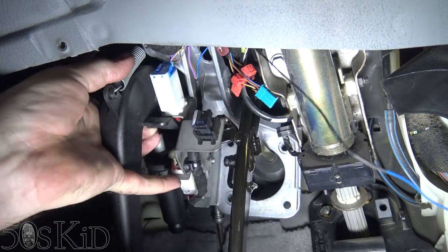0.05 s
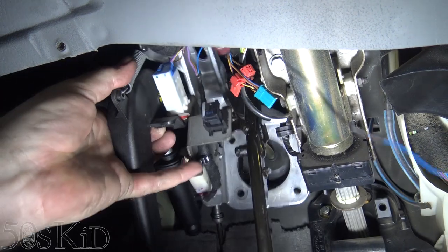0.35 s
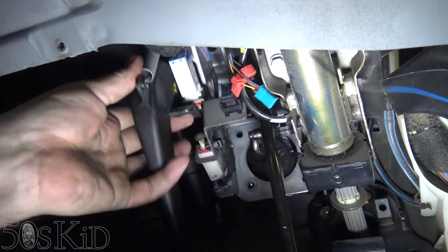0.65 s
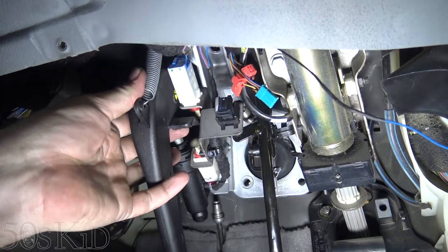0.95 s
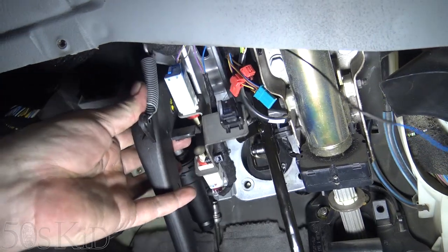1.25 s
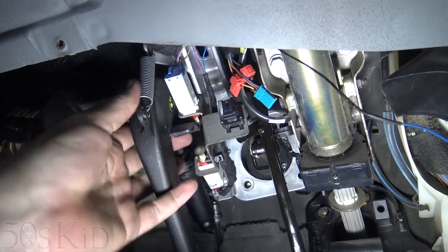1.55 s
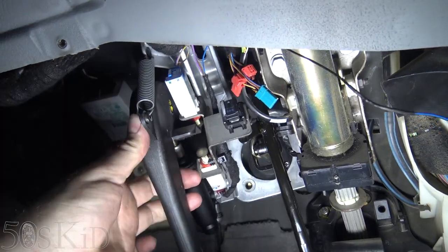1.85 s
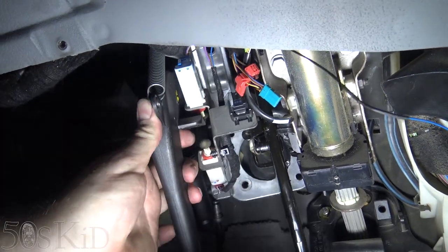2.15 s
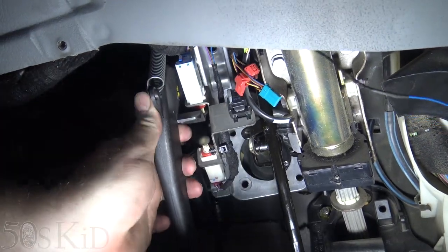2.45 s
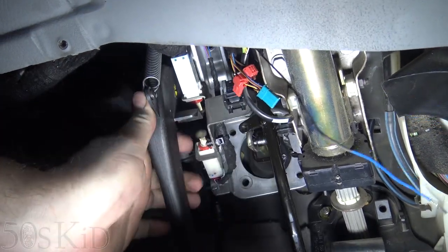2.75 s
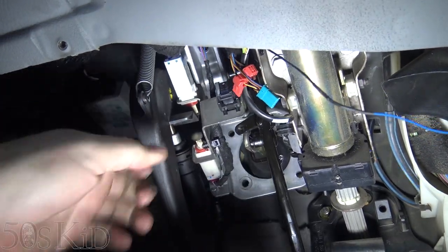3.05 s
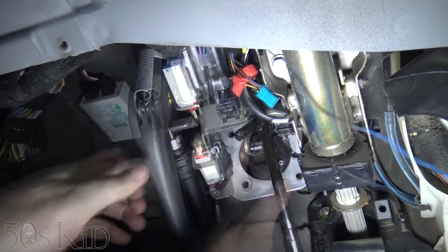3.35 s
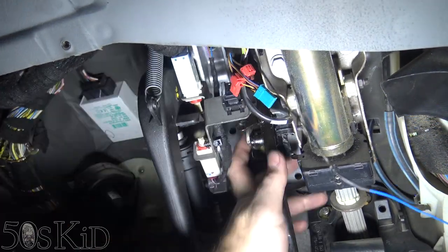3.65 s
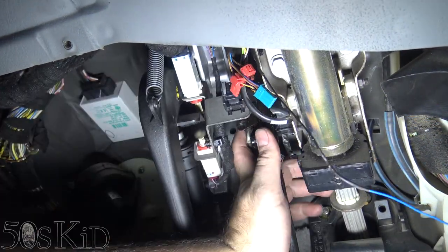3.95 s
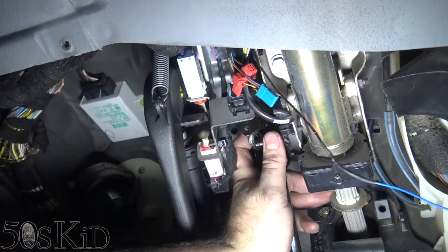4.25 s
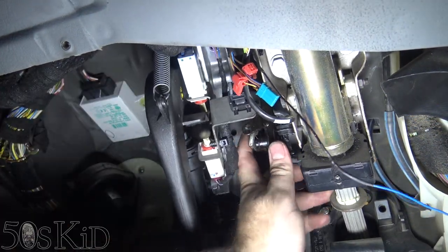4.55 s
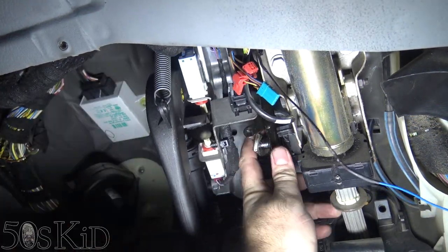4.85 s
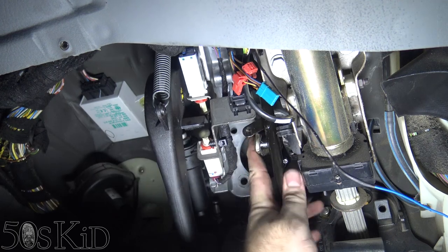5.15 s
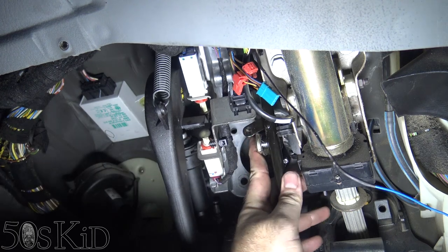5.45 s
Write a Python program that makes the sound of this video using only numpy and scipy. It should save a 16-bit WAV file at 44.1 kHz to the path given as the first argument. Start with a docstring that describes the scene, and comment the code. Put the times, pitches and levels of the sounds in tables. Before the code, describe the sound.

Close, irregular clunks and small clicks as a hand works a car pedal and its linkage, with brief scrapes and a tiny creak.

```python
"""In a car's footwell, a hand works a pedal and its linkage close to the microphone.
The pedal knocks on its stop; loose plastic and steel parts click, rub and groan against their bracket.
The bulkhead (the wall behind the pedal) booms under each blow and the carpeted cabin answers briefly.
Underneath are the rustle of hand and sleeve, the still garage and a faint hiss."""
import sys
import numpy as np
from scipy import signal
from scipy.fft import rfft, irfft, next_fast_len
from scipy.io import wavfile
from scipy.ndimage import map_coordinates

SR = 44100
rng = np.random.default_rng(int(sys.argv[2]) if len(sys.argv) > 2 else 0)


def store_pcm(level_fs):
    """Save levels as 16-bit WAV."""
    pcm = np.round(np.clip(level_fs, -1, 1) * 32767).astype(np.int16)
    wavfile.write(sys.argv[1], SR, np.atleast_2d(pcm).T)


N = 247401
FREQS_HZ = np.fft.rfftfreq(8192, 1 / SR) + 1

# the tones each part rings with when hit: f/Hz, width/Hz, level/dB
BULKHEAD_TONES = [(88.2, 8.2, -6), (114.7, 22.5, 2), (168, 58, -1)]
PEDAL_TONES = [(230, 110, -3.5), (292, 46, 1), (381.7, 90, -12)]
BRACKET_TONES = [(609, 81, 2), (780, 62, -6), (854, 60, -1), (955, 39, -2), (1190, 57, -13),
                 (1360, 69, -16.5), (1530, 93, -14.5)]
# the tones of the pedal arm when rubbed: f/Hz, width/Hz, level/dB
RASP_TONES = [(607, 150, -1.5), (860, 77, 5.5), (1010, 73, 2), (1380, 150, -2), (1730, 270, -8.5),
              (2290, 250, -17)]
# the dry crack of hard surfaces meeting: f/Hz, level/dB
CRACK_SPECTRUM = [(900, -18.5), (1900, 6), (2800, 1), (3200, -2), (3600, 2), (4100, -3), (5100, -3.5),
                  (5900, -5), (6700, -6.5), (9500, -14), (14000, -29)]


def knocks():
    """The pedal hits its stop: one firm blow sets bulkhead, pedal and bracket ringing at once."""
    # blows on the stop: t/s, level/dB, hardness/0-1
    hits = [(0.719, -17.5, 0.58), (2.8041, -18, 0.53), (3.8827, -19, 0.25), (5.03, -19, 0.6)]
    out = np.zeros(N)
    for start, db, hardness in hits:
        *part_dbs, crack_db = share_blow(db, hardness, bulkhead=-4, pedal=1, bracket=-7.5, snap=-26)
        parts = zip([BULKHEAD_TONES, PEDAL_TONES, BRACKET_TONES], part_dbs)
        body = struck(sum(ring(tones, part_db, vary_db=1.5) for tones, part_db in parts))
        sound = body + crack(crack_db, fade_s=0.0026, after_db=-19.5)
        add(out, start, in_cabin(sound, near_db=-12.5, far_db=-27.5))
    return out


def judder():
    """The linkage shakes into its seat: three growing touches, the main blow, then one bounce."""
    seat_s, seat_db, gap_s, soft = 4.3217, -18.5, .0098, .15
    lead_in = [(seat_s - k * gap_s, seat_db - 5.5 - 3 * k, soft) for k in (1, 2, 3)]
    seating = (seat_s, seat_db, 0.4)  # t/s, level/dB, hardness/0-1
    bounce = (seat_s + gap_s, seat_db - 14, soft)
    return light_hits(lead_in + [seating, bounce], bulkhead=-2.5, pedal=-6.5, bracket=0.5, snap=-27)


def bumps():
    """The whole assembly bumps the bulkhead, which gives a low boom."""
    # bumps: t/s, level/dB, hardness/0-1
    hits = [(.414, -28.5, 0.76), (.489, -27.5, 0.4), (1.135, -38.5, 1), (1.841, -36, 0.42),
            (2.01, -48.5, 0.2), (2.492, -36.5, 0.36), (4.282, -35, 0.2), (4.372, -34, .1),
            (4.682, -37.5, 0.2), (4.705, -34.5, .2)]
    return light_hits(hits, bulkhead=0.5, pedal=-7, bracket=-17.5, snap=-34)


def taps():
    """The pedal taps in the slack of its pivot."""
    # taps: t/s, level/dB, hardness/0-1
    hits = [(.133, -44, 0.68), (.152, -42.5, 0.78), (.231, -43, 0.55), (.279, -40.5, 0.5),
            (.351, -44, 0.84), (.375, -43, 0.85), (.394, -37, 0.56), (.581, -40, 0.8), (.603, -40.5, 0.3),
            (2.064, -50, 1), (2.46, -43, 0.73), (3.135, -41.5, 0), (5.216, -38, 0)]
    return light_hits(hits, bulkhead=0, pedal=1, bracket=-10.5, snap=-25)


def clicks():
    """Loose parts click on the bracket."""
    # clicks: t/s, level/dB, hardness/0-1
    hits = [(.051, -42, 0.62), (.848, -45.5, 0.56), (.885, -36.5, 0.26), (1.066, -49.5, 0.52),
            (1.125, -49.5, 0.4), (1.321, -48.5, 0.2), (1.355, -41, 0), (1.962, -56, 0.77),
            (2.286, -47, 0.2), (2.313, -42.5, 0.05), (2.323, -39, 0.66), (2.345, -43.5, 0.73),
            (2.373, -44, 0.59), (2.723, -43, 0.55), (3.052, -59.5, 0.94), (3.122, -61.5, 1),
            (5.277, -42.5, .2)]
    return light_hits(hits, bulkhead=-6.5, pedal=-6, bracket=-1, snap=-14.5)


def pings():
    """Small steel parts chatter and ring; the spot that is hit favours the tones near one pitch."""
    # hits on the steel: t/s, level/dB, favoured f/Hz, reach around it/octaves
    hits = [(0.0449, -32, 1700, 4), (0.719, -39.5, 5350, 0.042), (2.323, -52.5, 8300, 0.035),
            (2.346, -56.5, 8300, .04), (2.805, -44, 1900, 0.53), (4.302, -51, 4650, 0.25),
            (4.323, -22, 1110, 0.37), (4.47, -50.5, 1780, 0.09), (5.03, -31.5, 1430, 0.29),
            (5.244, -56.5, 4450, 1.9), (5.406, -58.5, 3900, 0.097)]
    # the steel's tones: f/Hz, width/Hz, level/dB
    steel_tones = [(978, 160, 5), (1360, 60, -2.5), (1730, 34, -5), (2030, 22, -12.5), (2600, 45, -23),
                   (2850, 60, -16), (3570, 34, -15), (4030, 40, -11), (4590, 91, -8.5), (5030, 210, -18.5),
                   (6780, 90, -11), (8100, 300, -28)]
    out = np.zeros(N)
    for start, db, hz, reach in hits:
        falloff = 1 + (np.log2(FREQS_HZ / hz) / reach) ** 2
        steel = struck(ring(steel_tones, vary_db=1) / falloff)
        sound = at_level(chatter(steel, fade_s=0.0041, per_s=1100), db)
        add(out, start, in_cabin(sound, near_db=-18.5, far_db=-23))
    return out


def scrapes():
    """Sliding parts catch in tiny slips that ring the pedal arm and add a fine gritty noise."""
    # dry strokes: start/s, end/s, level/dB, grit compared with the rasp/dB
    strokes = [(0.488, 0.517, -54, -1.5), (0.57, 0.72, -55.5, -11.5), (1.384, 1.548, -57.5, -17),
               (1.83, 1.872, -52, -24), (1.912, 1.918, -49, -24), (2.149, 2.298, -50, -27),
               (2.183, 2.242, -44, -18), (2.394, 2.49, -51, -11.5), (2.551, 2.583, -41.5, -24),
               (4.311, 4.325, -27.5, -24)]
    catches = slips(per_s=2000, spread_db=3)
    rasp = unit(signal.fftconvolve(catches, struck(ring(RASP_TONES)))[:N])
    grit = coloured(catches, CRACK_SPECTRUM)
    return sum(amp(db) * pressure(start, end, edge_s=0.0049) * (rasp + amp(grit_db) * grit)
               for start, end, db, grit_db in strokes)


def groans():
    """Under load the pivot sticks and slips almost regularly, in a rough falling tone."""
    # groans: start/s, end/s, first f/Hz, last f/Hz, level/dB
    glides = [(2.403, 2.443, 515, 493, -40.5), (2.456, 2.486, 515, 469, -36)]
    t, out = np.arange(N) / SR, np.zeros(N)
    for start, end, start_hz, end_hz, db in glides:
        pitch = np.interp(t, [start, end], [start_hz, end_hz]) * (1 + 0.046 * wobble(190))
        phase = 2 * np.pi * np.cumsum(pitch) / SR
        tone = np.sin(phase) + amp(-11) * np.sin(2 * phase) + amp(-23) * np.sin(3 * phase)
        rough_tone = unit(tone * amp(2.9 * wobble(120)))
        out += amp(db) * pressure(start, end, edge_s=0.011) * rough_tone
    return out


def handling():
    """Hand and sleeve move on the parts: one effort drives a rumble, a rub, a rustle and stray ticks."""
    # how strongly the hand moves: t/s, level/dB
    movement = [(0.0, -49), (0.26, -60.5), (0.59, -51), (1.11, -64.5), (1.81, -70.5), (2.2, -57),
                (2.34, -58), (2.4, -53), (2.54, -56.5), (3.12, -71.5), (3.7, -65), (4.15, -61.5),
                (4.35, -57.5), (5.6, -63.5)]
    # the colour of each noise, dull to bright: f/Hz, level/dB
    rumble_spectrum = [(20, -16), (55, 2.5), (85, 0), (115, 3), (190, -11), (300, -5.5), (420, -13),
                       (600, -15.5), (1200, -74)]
    rub_spectrum = [(250, -44.5), (480, 4.5), (620, -8), (950, 1), (1400, -11), (2100, -13), (3200, -49),
                    (8000, -75.5)]
    rustle_spectrum = [(1200, -26), (2400, -4.5), (5000, -1), (7000, -3), (9800, -15.5), (15000, 2)]
    usual_db = -59.5
    movement_db = np.interp(np.arange(N) / SR, *np.transpose(movement))
    effort_db = movement_db - usual_db
    grip = wobble(28)
    rumble = coloured(rng.standard_normal(N), rumble_spectrum)
    rumble *= amp(-49.5 + 0.99 * effort_db + 2 * grip)
    rub = coloured(slips(per_s=900, spread_db=6.5), rub_spectrum)
    rub *= amp(movement_db - 2 + 1.8 * grip)
    rustle = coloured(slips(per_s=4000, spread_db=4), rustle_spectrum)
    rustle *= amp(-67 + 0.81 * effort_db + 0.89 * grip)
    finger_tick = chatter(struck(ring(RASP_TONES, tilt_db=-3.5, vary_db=1)), fade_s=.004, per_s=720)
    ticks = unit(signal.fftconvolve(slips(per_s=7, spread_db=3), finger_tick)[:N])
    ticks *= amp(-70.5 + effort_db / 2)
    return rumble + rub + rustle + ticks


def background():
    """The still garage and the microphone's even hiss."""
    # the garage's air: f/Hz, level/dB
    air_spectrum = [(25, 4), (60, -1.5), (115, 2), (190, -19.5), (300, -13), (470, -33.5), (620, -5),
                    (950, -11), (1400, -16), (2600, -19.5), (9000, -26)]
    air = amp(-60) * coloured(rng.standard_normal(N), air_spectrum)
    hiss = amp(-61) * coloured(rng.standard_normal(N), [(1000, -15.5), (7000, -20), (15000, 6.5)])
    return air + hiss


def light_hits(hits, **shares_db):
    """Each light touch makes the bulkhead boom, the pedal thud and the bracket chatter, with a crack."""
    out = np.zeros(N)
    for start, db, hardness in hits:
        boom_db, thud_db, clack_db, crack_db = share_blow(db, hardness, **shares_db)
        boom = ring(BULKHEAD_TONES, boom_db, tilt_db=-15, vary_db=2.5)
        thud = ring(PEDAL_TONES, thud_db, tilt_db=24, vary_db=2.5)
        bracket = struck(ring(BRACKET_TONES, tilt_db=4.5, vary_db=2.5))
        clack = at_level(chatter(bracket, fade_s=0.0062, per_s=1000), clack_db)
        sound = struck(boom + thud) + clack + crack(crack_db, fade_s=0.0065, after_db=-14)
        add(out, start, in_cabin(sound, near_db=-13.5, far_db=-25))
    return out


def share_blow(db, hardness, bulkhead, pedal, bracket, snap):
    """Shares a blow, in dB, among three parts and the crack (snap); harder blows are brighter."""
    # what the hardest blow gains over the softest: bulkhead/dB, pedal/dB, bracket/dB, crack/dB
    hard_gain_db = (-4.5, 2.5, 6, 30.5)
    return db + np.array([bulkhead, pedal, bracket, snap]) + (hardness - .5) * np.array(hard_gain_db)


def ring(tones, db=0, tilt_db=0, vary_db=0):
    """A part's power at each frequency, tilted per octave; each hit shifts the tones a little."""
    hz, width, level = np.transpose(tones)[:, :, None]
    strength, shift = rng.standard_normal((2, len(tones), 1))
    centre = hz * (1 + .015 * shift)
    height = amp(level + tilt_db * np.log2(hz) + vary_db * strength) ** 2
    peaks = height / (1 + ((FREQS_HZ - centre ** 2 / FREQS_HZ) / width) ** 2)
    # a part gives off little sound above or below its own tones
    treble_cut = 1 + (FREQS_HZ / (1.15 * hz.max())) ** 10
    bass_cut = 1 + (.7 * hz.min() / FREQS_HZ) ** 6
    power = peaks.sum(0) / treble_cut / bass_cut
    return amp(db) ** 2 * SR / 50 * power / power.mean()  # the energy of 20 ms at db


def struck(power):
    """Turns power at each frequency into the sound of a hit, packed as early as it can be."""
    cepstrum = irfft(np.log(power + power.max() / 10 ** 10) / 2)
    # fold the second half onto the first, so nothing sounds before the hit
    cepstrum[1:len(FREQS_HZ) - 1] *= 2
    cepstrum[len(FREQS_HZ):] = 0
    return irfft(np.exp(rfft(cepstrum)))


def crack(db, fade_s, after_db):
    """Hard surfaces meet in a burst of noise with a brief, weaker tail."""
    t = np.arange(2 * len(FREQS_HZ) - 2) / SR
    burst = rng.standard_normal(len(t)) * (np.exp(-t / fade_s) + amp(after_db) * np.exp(-t / 0.007))
    colour = struck(amp(along(CRACK_SPECTRUM, FREQS_HZ)) ** 2)
    return at_level(signal.fftconvolve(burst, colour)[:len(t)], db)


def chatter(sound, fade_s, per_s):
    """A loose part touches again several times within a few milliseconds."""
    t = np.arange(SR // 25) / SR
    touches = (rng.random(len(t)) < per_s / SR) * rng.uniform(-1.77, 1, len(t)) * np.exp(-t / fade_s)
    touches[0] = 1
    return signal.fftconvolve(sound, touches)[:len(sound)]


def slips(per_s, spread_db):
    """Tiny jolts at random moments, of very uneven size."""
    moments = rng.random(N) < per_s / SR
    return moments * rng.choice([-1, 1], N) * amp(spread_db * rng.standard_normal(N))


def pressure(start, end, edge_s):
    """The push of one stroke, easing in and out."""
    t = np.arange(N) / SR
    return np.clip((t - start) / edge_s + .5, 0, 1) * np.clip((end - t) / edge_s + .5, 0, 1)


def in_cabin(sound, near_db, far_db):
    """The direct sound plus echoes from the footwell's close walls and the cabin behind."""
    # how long each space rings: f/Hz, time to fade by 60 dB/s
    footwell_decay = [(100, 0.13), (1000, 0.084), (2500, 0.045), (9000, 0.031)]
    cabin_decay = [(100, 0.83), (300, 0.31), (1000, 0.22), (3000, 0.11), (9000, 0.094)]
    space = amp(near_db) * echoes(footwell_decay, build_s=0.0022)
    space += amp(far_db) * echoes(cabin_decay, build_s=0.014)
    space[0] += 1  # the direct sound
    return signal.fftconvolve(sound, space)


def echoes(decay, build_s):
    """A blur of reflections that builds up and dies away, with total energy 1."""
    hz, t, noise = signal.stft(rng.standard_normal(SR // 2), SR, nperseg=256)
    fade = amp(-60 * t / along(decay, hz)[:, None])
    tail = signal.istft(noise * fade, SR, nperseg=256)[1][:SR // 2]
    tail *= 1 - np.exp(-(np.arange(len(tail)) / SR / build_s) ** 2)
    return tail / np.linalg.norm(tail)


def amp(db):
    """Turns decibels into a multiplier."""
    return 10 ** (np.asarray(db) / 20)


def unit(x):
    """Scales a sound to an average power of 1."""
    return x / np.sqrt(np.mean(x ** 2) + 1e-20)


def at_level(sound, db):
    """Gives a short sound the energy of 20 ms at that level."""
    return amp(db) * np.sqrt(SR / 50) * sound / np.linalg.norm(sound)


def along(points, hz):
    """Reads between (f/Hz, value) points, with octaves evenly spaced."""
    freqs, values = np.transpose(points)
    return np.interp(np.log(hz + 1), np.log(freqs + 1), values)


def filtered(x, gain):
    """Turns each frequency up or down by gain(hz)."""
    size = next_fast_len(len(x) + 8192)
    return irfft(rfft(x, size) * gain(np.fft.rfftfreq(size, 1 / SR)), size)[:len(x)]


def coloured(x, spectrum):
    """Shapes a sound's bass and treble, at an average power of 1."""
    return unit(filtered(x, lambda hz: amp(along(spectrum, hz))))


def wobble(per_s):
    """A smooth curve through per_s random values a second."""
    return map_coordinates(rng.standard_normal(1024), [np.arange(N) * per_s / SR], mode="wrap")


def add(track, start_s, sound):
    """Mixes a sound into the track from the given time."""
    part = track[max(round(start_s * SR), 0):][:len(sound)]
    part += sound[:len(part)]


def scene():
    """Everything in the footwell, as one channel."""
    blows = knocks() + taps() + bumps() + clicks() + judder() + pings()
    friction = in_cabin(scrapes() + groans(), near_db=-17.5, far_db=-53)[:N]
    return (blows + friction + handling() + background())[None]


def record(dry):
    """The microphone dulls the highest treble and passes nothing above its limit."""
    # the treble steps down: f/Hz, level/dB
    treble = [(9700, 0), (10300, -16), (14500, -18), (15600, -24)]
    limit_hz = 15700
    return np.array([filtered(x, lambda hz: amp(along(treble, hz)) * (hz < limit_hz)) for x in dry])


dry = scene()
out = record(dry)
store_pcm(out)
```